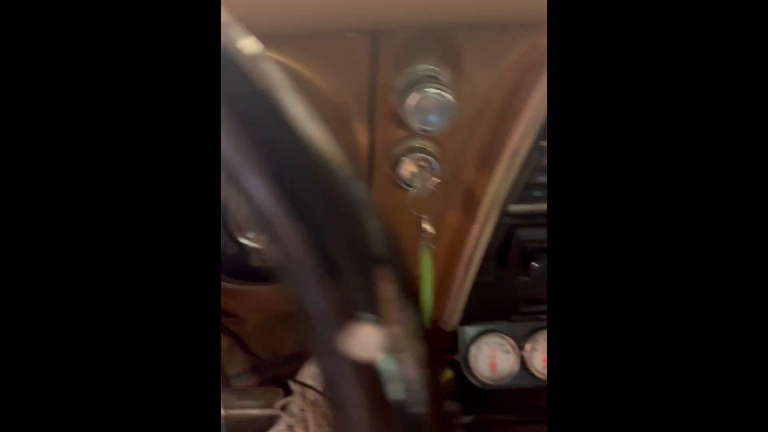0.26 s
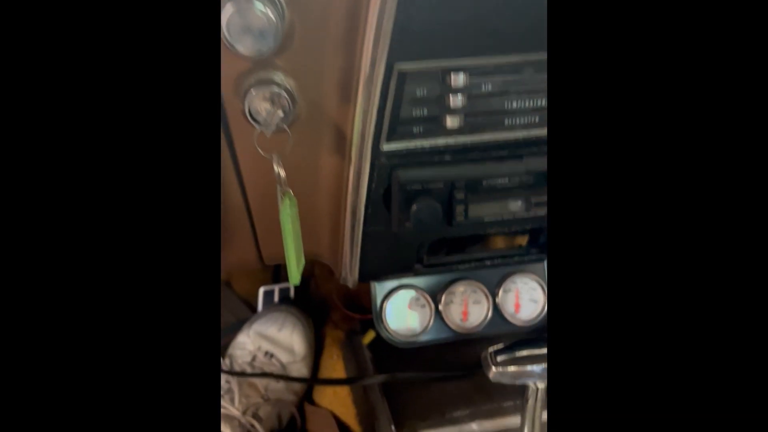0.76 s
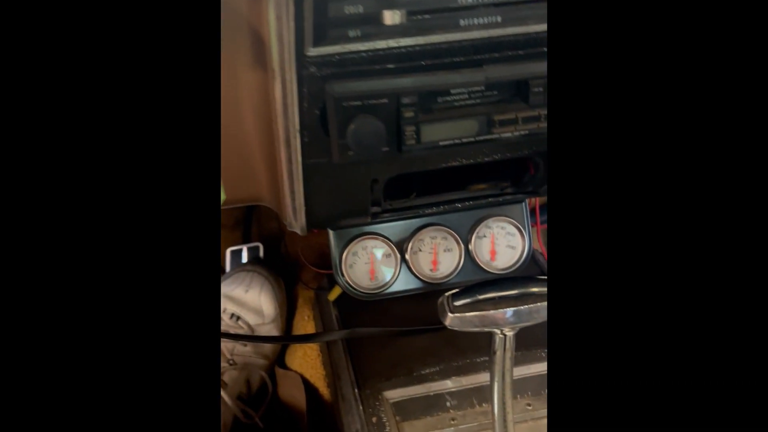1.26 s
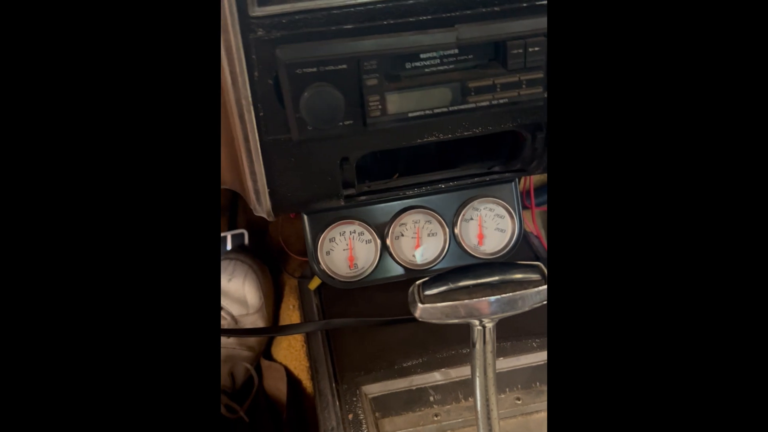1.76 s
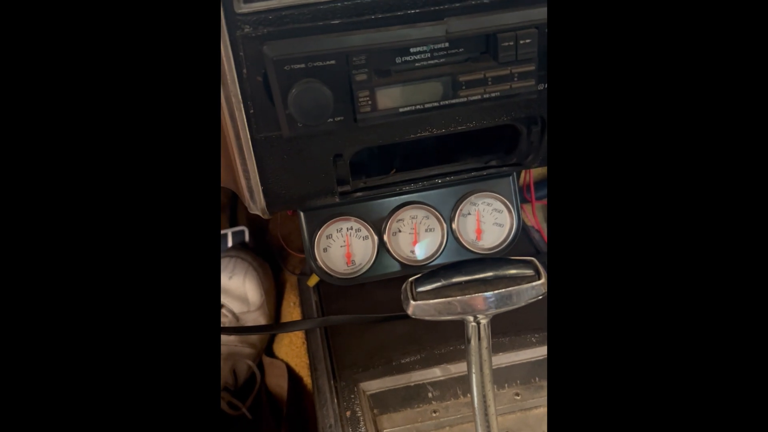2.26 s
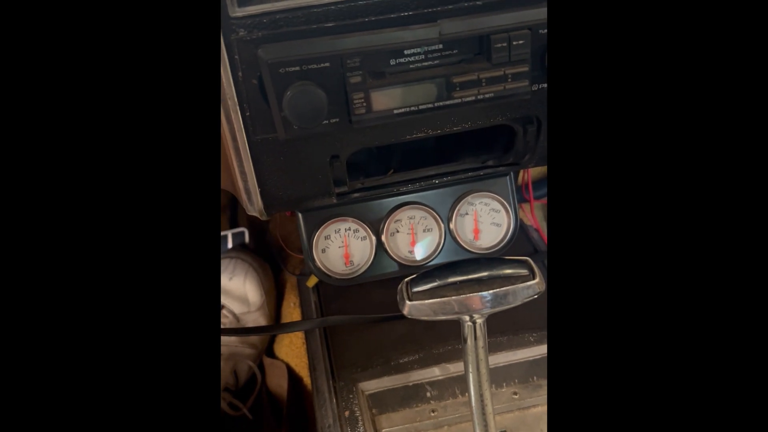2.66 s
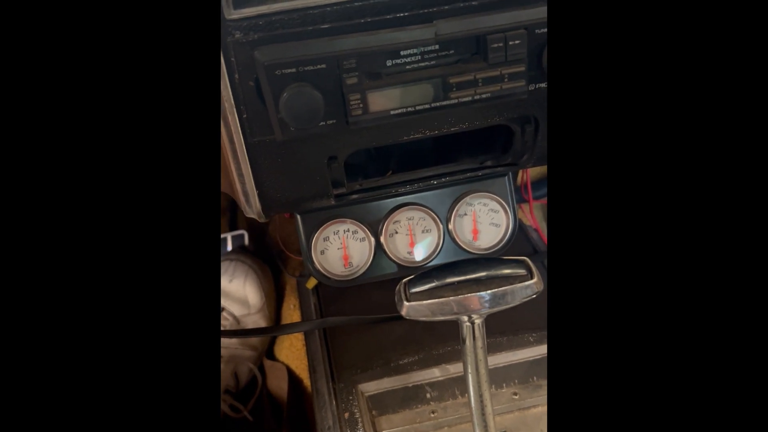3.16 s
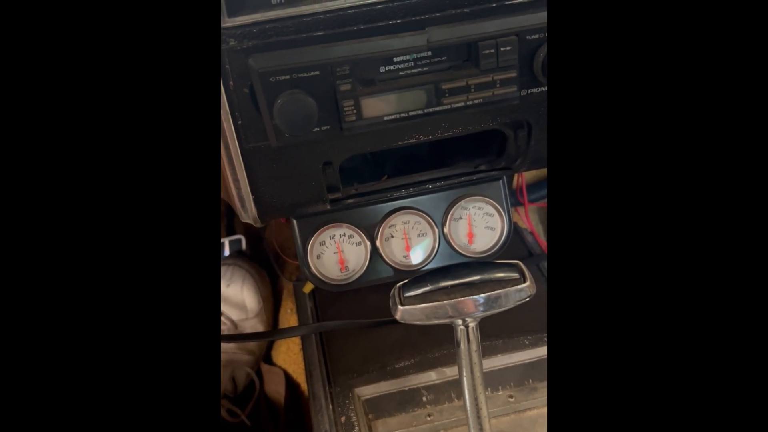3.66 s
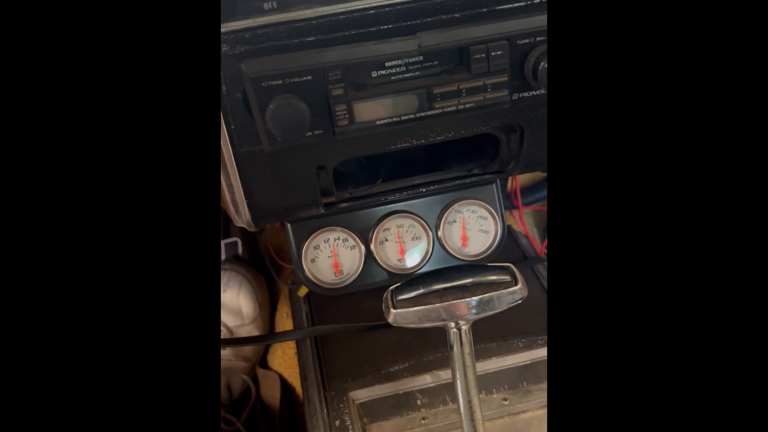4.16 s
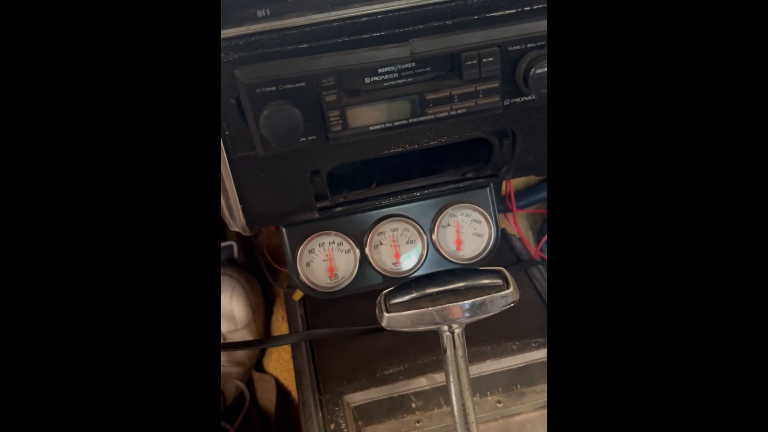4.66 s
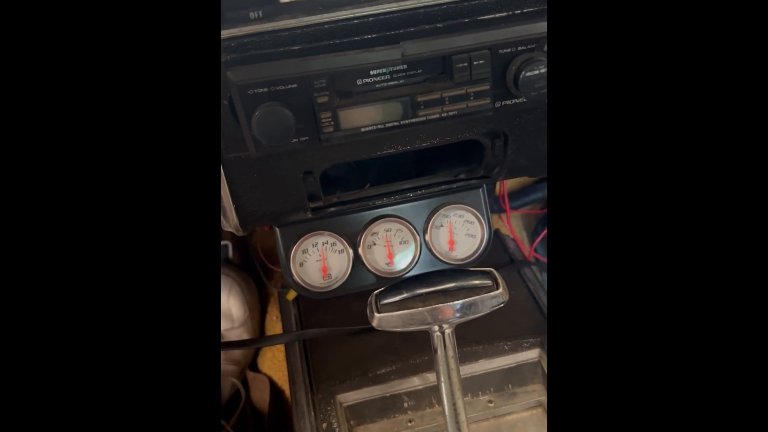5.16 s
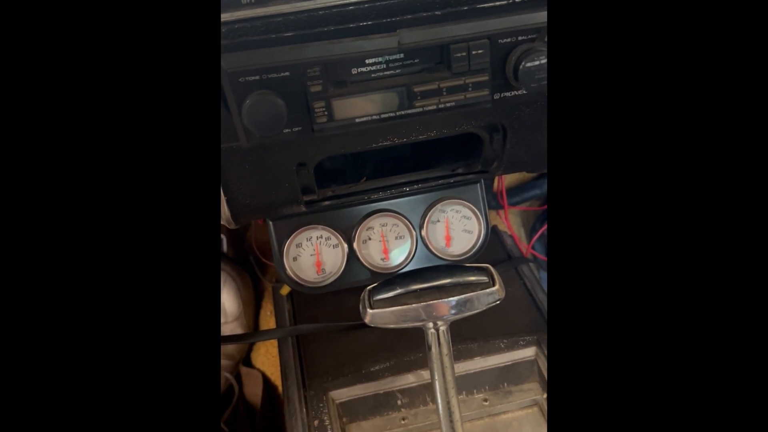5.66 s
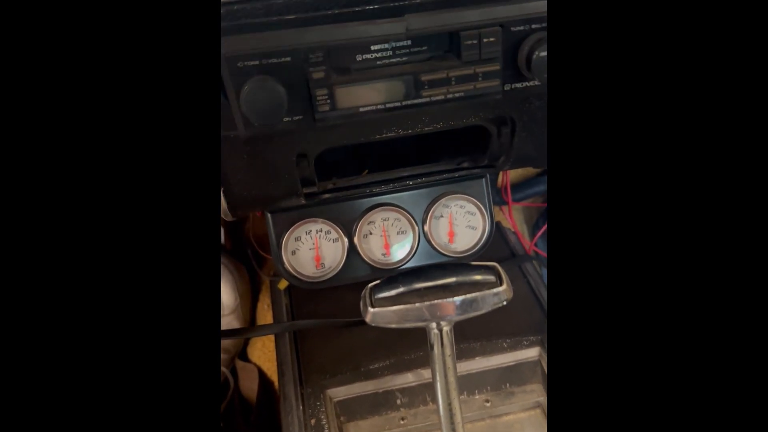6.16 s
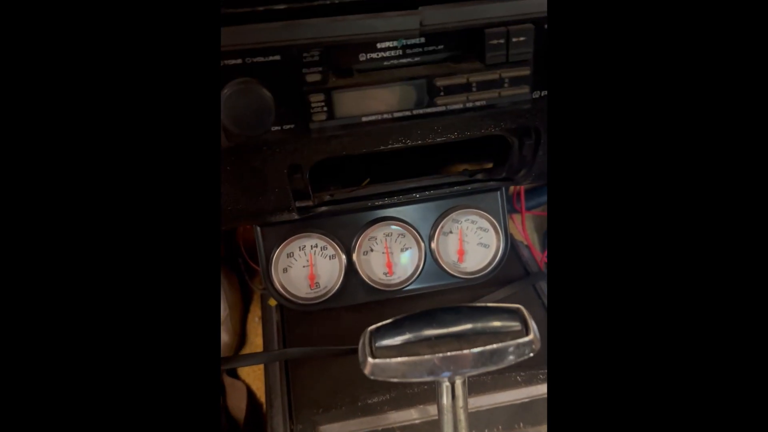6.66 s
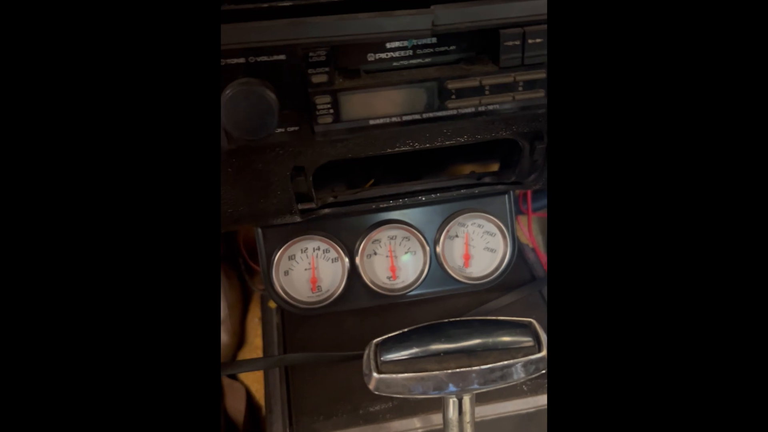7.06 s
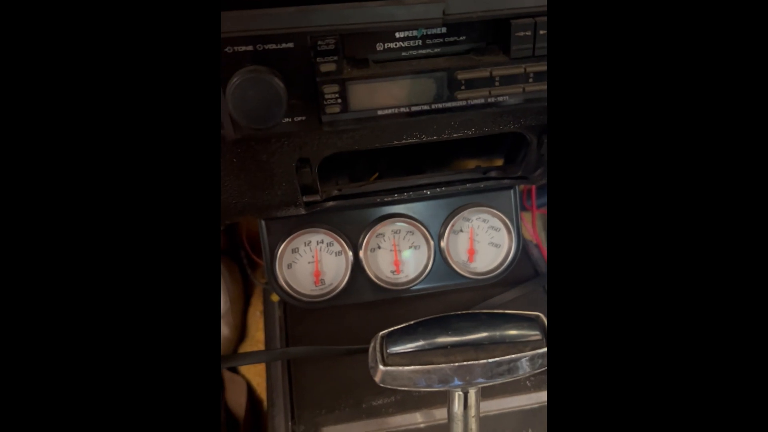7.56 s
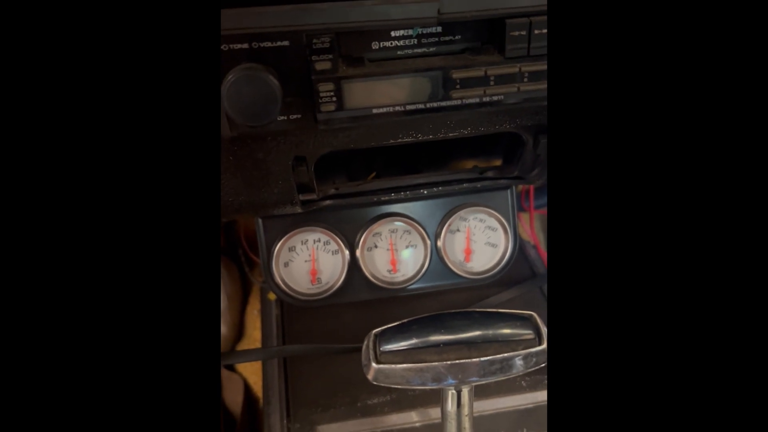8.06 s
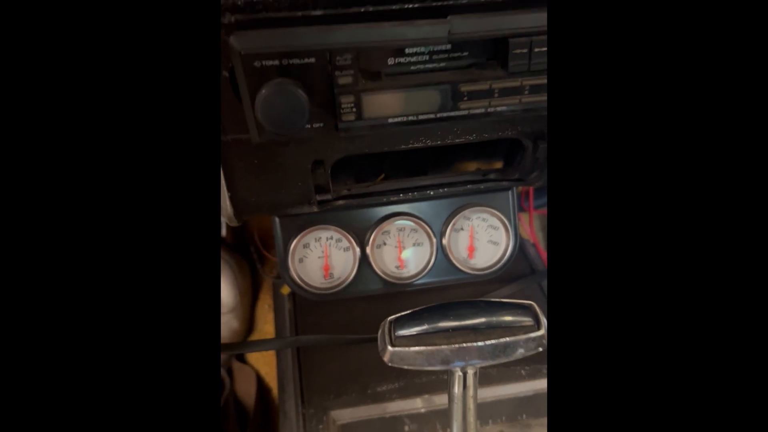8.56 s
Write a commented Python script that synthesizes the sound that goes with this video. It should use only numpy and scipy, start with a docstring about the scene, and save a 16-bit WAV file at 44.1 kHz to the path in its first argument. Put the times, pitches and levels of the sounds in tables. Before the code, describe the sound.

A steady low engine drone drops away at two seconds, almost dies, then catches and throbs unevenly, with breathy carburettor hiss and loose panel knocks.

```python
"""From the driver's seat, in a workshop, two microphone ports hear a V8 with a wild cam.
First a fast-idle drone of steady lines on the cycle rate, under a resonant rasp and a rush of air.
From about 2 s it slows, nearly stalls, catches and lopes: uneven clicks ring the boom of pipes and cabin.
Filtered-noise gulps of carburettor air hiss from 2.5 s; narrow-band whistles join some from 3.6 s.
From 4.4 s a loose panel knocks now and then, as short runs of clicks ring its modes."""
import sys
import numpy as np
from scipy import signal
from scipy.fft import rfft, irfft
from scipy.io import wavfile
from scipy.ndimage import uniform_filter1d, minimum_filter1d

SR = 44100
rng = np.random.default_rng(int(sys.argv[2]) if len(sys.argv) > 2 else 0)


def unload_audio(sound):
    """Save the sound as a 16-bit wav file, at the path given as the first command line argument."""
    columns = np.transpose(np.atleast_2d(sound))
    # keep every value between -1 and 1, then stretch to whole-number steps
    steps = np.round(np.clip(columns, -1, 1) * 32767)
    wavfile.write(sys.argv[1], SR, steps.astype(np.int16))


N = 388521
TIME = np.arange(N) / SR
FREQS = np.maximum(np.fft.rfftfreq(N, 1 / SR), 1)

# engine speed, eight firings to a cycle: t/s, firing rate f/Hz
ENGINE_SPEED = [(0, 100.3), (.6, 101.7), (1.2, 100.7), (1.88, 101.5), (2.02, 90), (2.25, 73), (2.5, 60),
                (2.9, 46), (3.6, 38.6), (4.0, 41.8), (4.4, 53), (5, 43.5), (5.85, 41.5), (6.6, 45),
                (6.9, 43)]


def from_db(db):
    """Decibels to gain."""
    return 10 ** (np.asarray(db) / 20)


def rms_one(x):
    """Scale to unit rms."""
    return x / np.sqrt(np.mean(x ** 2) + 1e-20)


def short_rms(x, span_s):
    """Running rms, smoothed twice over the span, with a small floor."""
    size = max(int(span_s * SR), 2)
    power = uniform_filter1d(uniform_filter1d(x * x, size), size)
    return np.sqrt(np.maximum(power, 0) + 1e-5 * np.mean(power))


def in_time(rows):
    """A curve at every sample; its ends are held."""
    return np.interp(TIME, *np.transpose(rows))


def over_hz(points):
    """A curve at every frequency, straight in log frequency."""
    hz, value = np.transpose(points)
    return np.interp(np.log(FREQS), np.log(hz), value)


def drift(rate_hz):
    """Slow chance of spread 1, falling away above the rate."""
    knots = np.arange(0, N + 200, 100)
    hz = np.fft.rfftfreq(len(knots), knots[1] / SR)
    spectrum = rfft(rng.standard_normal(len(knots))) / (1 + (hz / rate_hz) ** 4)
    slow = irfft(spectrum, len(knots))
    return np.interp(np.arange(N), knots, rms_one(slow))


def resonate(x, modes):
    """Parallel two-pole resonances of alternating sign."""
    out = 0
    for k, (hz, width_hz, db) in enumerate(modes):
        r = np.exp(-np.pi * width_hz / SR)
        poles = [1, -2 * r * np.cos(2 * np.pi * hz / SR), r * r]
        gain = (-1) ** k * from_db(db) * (1 - r * r) / 2
        out = out + gain * signal.lfilter([1, 0, -1], poles, x + 1e-18)
    return out


def band(x, low_hz, high_hz, order):
    """Butterworth band-pass."""
    return signal.sosfilt(signal.butter(order, [low_hz, high_hz], "band", fs=SR, output="sos"), x)


def air_noise(gain, ripple_db):
    """Stereo turbulence; close reflections in the cabin comb its spectrum, differently at each port."""
    # likeness of the two microphone ports: f/Hz, likeness (0-1)
    likeness = [(200, 0.95), (900, 0.93), (1400, 0.88), (1900, 1), (2400, 0.17), (3500, 0.11), (4900, 0.17),
                (5900, 0.11), (8800, 0.25), (15000, 0.68)]
    # phase by which the left port leads: f/Hz, phase/rad
    port_phase = [(200, -2.4), (2000, 0.47), (2700, 2), (4000, 0.25), (5100, -1.6), (5900, -0.92),
                  (12000, -1.05), (15500, -2)]
    alike = np.clip(over_hz(likeness), 0, 1)
    sign = np.array([[1], [-1]])  # left, right
    shared_share, own_share = np.sqrt(1 + alike), sign * np.sqrt(1 - alike)
    mid, side = rfft(rng.standard_normal((2, N)))
    ports = shared_share * mid + own_share * side
    ports = ports * np.exp(.5j * sign * over_hz(port_phase))
    # the spectrum of 12 ms of chance makes the ripple
    shared, own = rfft(rng.standard_normal((2, int(0.012 * SR))), N).real
    comb = rms_one(shared_share * shared + own_share * own)
    return rms_one(irfft(ports * gain * from_db(ripple_db * comb), N))


def firings(cycles, unevenness, scatter_db, jitter_s):
    """One click a firing: the banks reach the cabin unequally, and in the lope the same ones keep missing."""
    # strength of each burn over the two cycles in which the lope repeats: level/dB
    burn_level = [0, -20, 0, -13, 2, -24, -5, -1, -24, 0, -22, 0, -2, -23, 1.5, -25]
    # firings that take the longer pipe: 1 if so, else 0
    far_bank = [0, 1, 1, 0, 1, 0, 0, 1]
    far_bank_delay_s = .0041
    # relative level pattern of the eight cylinders; its depth in dB is set below
    cylinder_pattern = np.array([-2.5, 0.0, 0.5, 0.0, -14.0, -2.0, -2, -1.0])
    at = np.flatnonzero(np.diff(np.floor(cycles * len(cylinder_pattern))))
    uneven = unevenness[at]
    chance = rng.standard_normal((len(at), 2)) * uneven[:, None]

    burn_number = np.round(cycles[at] * len(cylinder_pattern)).astype(int)
    burn_db = np.take(burn_level, burn_number, mode="wrap")
    cylinder_db = (3.0 - uneven) * np.resize(cylinder_pattern, len(at))
    strength = from_db(cylinder_db + uneven * burn_db + scatter_db * np.minimum(chance[:, 0], 1.5))

    pipe_number = np.round(cycles[at] * len(far_bank)).astype(int)
    late_s = far_bank_delay_s * uneven * np.take(far_bank, pipe_number, mode="wrap")
    shift = ((late_s + jitter_s * chance[:, 1]) * SR).astype(int)
    clicks = np.zeros(N)
    clicks[np.clip(at + shift, 0, N - 1)] = strength
    return clicks


def drone(cycles):
    """Even firing gives clean lines on the cycle rate; the upper ones, partly in step, throb once a cycle."""
    # even running: t/s, relative level/dB
    drone_level = [(0, -13), (1.0, -13.5), (1.95, -12.5), (2.15, -17), (2.25, -20.5), (2.48, -22),
                   (2.6, -42), (2.8, -74)]
    # exhaust note on fast idle: multiple of the cycle rate, relative level/dB
    note_lines = [(3, -42), (4, -50), (5, -19.5), (6, -22.5), (7, -24.5), (8, 5.5), (9, -14.5), (10, -12),
                  (11, -20), (12, -13.5), (14, -23), (15, -30.5), (17, -34), (18, -23), (19, -25.5),
                  (20, -31), (22, -35), (24, -33), (26, -42), (27, -29.5), (28, -31), (29, -31.5),
                  (30, -30), (31, -33.5), (32, -39.5)]
    out = np.zeros(N)
    wavers = [drift(3.7) for k in range(5)]
    for k, (multiple, db) in enumerate(note_lines):
        waver_db = .7 if db < -10 else .25
        spread = 1 if multiple < 14 else .4  # range of starting phases, in turns of 2 pi
        phase = 2 * np.pi * (round(multiple) * cycles + spread * rng.random())
        out += from_db(db + waver_db * wavers[k % len(wavers)]) * np.sin(phase)
    return from_db(in_time(drone_level)) * out


def rasp(clicks, cycles, loping):
    """Each firing is a crack and a puff of gas in the higher resonances; on fast idle it throbs each cycle."""
    # rasp of the exhaust: t/s, relative level/dB
    rasp_level = [(0, -35.5), (1.85, -36), (2.2, -37.5), (2.5, -48), (3.0, -52), (3.55, -56), (3.95, -48),
                  (4.3, -35), (5.4, -42.5), (6.2, -38.5), (8.8, -39)]
    # higher pipe and panel resonances: f/Hz, width/Hz, relative level/dB
    rasp_modes = [(187.9, 8, 8), (243.4, 16, 1), (280.3, 22, -2.5), (342.6, 19.7, 3), (386, 17, -6),
                  (439.5, 29, -13.5), (608.4, 33, -12), (781.6, 40, -14), (1140, 270, -32.5)]
    puff_fall_s = 0.055
    gas = signal.lfilter([1], [1, -np.exp(-1 / (puff_fall_s * SR))], clicks + 1e-18)
    puff = gas * rng.standard_normal(N)
    throb = from_db(4.5 * (1 - loping) * np.cos(2 * np.pi * cycles))
    blows = throb * (clicks + (0.012 + .045 * loping) * puff)
    ringing = band(resonate(blows, rasp_modes), low_hz=144, high_hz=1200, order=2)
    return from_db(in_time(rasp_level)) * ringing / short_rms(ringing, span_s=0.24)


def air_rush(loping):
    """Air and fan rush as coloured noise; belt and fan whines are narrow resonances that fade in the lope."""
    # rush of air and fan: t/s, relative level/dB
    rush_level = [(0, -63), (1.88, -58.5), (1.98, -54), (2.15, -55), (2.26, -64), (2.8, -67), (2.9, -71.5),
                  (3.5, -72), (3.9, -62.5), (8.8, -54.5)]
    # its spectrum: f/Hz, relative level/dB
    rush_colour = [(200, 1.5), (700, 6.5), (1100, 6), (1500, 0.5), (2100, -2), (2600, -0.5), (3100, -4),
                   (5500, -4.5), (7600, -4.5), (8600, -5.5), (9600, -7.5), (13000, -10), (15700, -15.5)]
    # faint whines of belts and fan: f/Hz, width/Hz, level/dB against the rush
    whines = [(2620, 50, 7), (3546, 64, 8), (7600, 180, 5), (9540, 120, 6.5)]
    noise = air_noise(from_db(over_hz(rush_colour)), ripple_db=2.0)
    rush = from_db(in_time(rush_level) + 6.5) * noise
    # the whines ring from the same noise, shifted a second
    return rush + (1 - loping) * resonate(np.roll(rush, SR, axis=1), whines)


def boom(clicks):
    """Lumpy firings ring the pipes and the cabin air: each mode follows the throbs to its own degree."""
    # boom between throbs: t/s, relative level/dB
    boom_level = [(2.3, -24), (3.0, -31), (3.5, -35), (4.3, -19), (5.8, -24), (6.5, -18.5)]
    # throbs, each a run of hard burns: middle t/s, half length/s, relative level/dB
    throbs = [(2.31, 0.14, -15), (2.584, 0.038, -17.0), (2.742, 0.081, -18), (3.015, 0.11, -21.5),
              (3.37, 0.23, -27), (3.803, 0.11, -17.0), (4.12, 0.1, -14.5), (4.265, 0.033, -4),
              (4.394, 0.032, -8.5), (4.59, 0.14, -8.5), (4.743, 0.016, -8.5), (4.84, 0.048, -11),
              (4.971, 0.031, -5.5), (5.073, 0.02, -8.5), (5.203, 0.051, -10), (5.354, 0.021, -3),
              (5.465, 0.044, -11), (5.613, 0.05, -11), (5.74, 0.02, -5.5), (5.875, 0.019, -10),
              (5.999, 0.065, -9.5), (6.179, 0.061, -9.0), (6.312, 0.032, -6.5), (6.402, 0.02, -9.5),
              (6.484, 0.075, -9), (6.61, 0.09, -6.5), (6.768, 0.0097, -8), (6.877, 0.069, -7.5),
              (7.131, 0.025, -4.5), (7.252, 0.081, -9.5), (7.42, 0.02, -5), (7.507, 0.029, -7),
              (7.61, 0.038, -7), (7.798, 0.034, -6), (7.887, 0.017, -6.5), (8.006, 0.077, -9.5),
              (8.146, 0.04, -5), (8.312, 0.073, -9.5), (8.453, 0.013, -5), (8.541, 0.025, -2.5),
              (8.655, 0.051, -9.0), (8.77, 0.031, -6.5)]
    # pipes and cabin: f/Hz, width/Hz, relative level/dB, exponent with which it follows the throbs
    boom_modes = [(44, 4.3, -16, 0.42), (61.4, 5.8, -8, .8), (83.47, 11.9, -7, 0.61), (95.54, 13, 1, 1.05),
                  (117.6, 6.1, -13.5, 0.86), (156.8, 5.3, -29.5, 0.39)]
    power = from_db(in_time(boom_level)) ** 2
    for s, spread_s, db in throbs:
        span = slice(int((s - .5) * SR), int((s + .5) * SR))
        power[span] += from_db(db) ** 2 * np.exp(-((TIME[span] - s) / spread_s) ** 2)
    level = np.sqrt(power)
    average = short_rms(level, span_s=0.75)
    out = 0
    for hz, width_hz, db, follows in boom_modes:
        mode = [(hz, width_hz, 0)]
        ringing = resonate(resonate(clicks, mode), mode)
        steady = ringing / short_rms(ringing, span_s=.09)  # quicker lumps come through
        out = out + from_db(db) * average * (level / average) ** follows * steady
    return out


def burst(age, length_s, rise_s, fall_db_per_s):
    """A quick swell, a short hold, then the dying echo of the workshop."""
    return np.clip(age / rise_s, 0, 1) * from_db(-fall_db_per_s * np.maximum(age - length_s, 0))


def intake_power():
    """Power of the air drawn in, gulp by gulp."""
    # gulps at the carburettor: t/s, length/s, relative level/dB
    gulp_times = [(2.555, .012, -53.5), (2.908, 0.05, -56.5), (2.988, 0.045, -58), (3.209, 0.015, -55),
                  (3.313, 0.016, -54), (3.384, 0.022, -51.5), (3.545, 0.026, -51), (3.592, 0.019, -46),
                  (3.67, 0.014, -44), (3.755, 0.012, -40.5), (3.794, 0.0066, -35), (3.856, 0.08, -67),
                  (3.958, 0.027, -44), (3.996, 0.016, -38), (4.03, 0.048, -40), (4.124, 0.028, -35.5),
                  (4.174, 0.057, -39), (4.246, 0.07, -35.0), (4.33, 0.11, -37), (4.458, 0.071, -39.5),
                  (4.559, 0.048, -42.5), (4.611, 0.02, -39.5), (4.673, 0.019, -41), (4.708, 0.062, -45),
                  (4.802, 0.037, -44), (4.913, 0.028, -43), (4.942, 0.108, -47), (5.07, 0.013, -40.5),
                  (5.174, 0.042, -46), (5.24, 0.02, -44.5), (5.29, 0.058, -40.5), (5.4, 0.012, -41.5),
                  (5.447, 0.012, -40), (5.559, 0.045, -41), (5.593, 0.16, -47), (5.699, 0.056, -42.5),
                  (5.843, 0.029, -39), (5.927, 0.133, -44.5), (6.088, 0.02, -37.5), (6.136, 0.034, -41),
                  (6.222, 0.072, -40), (6.339, 0.045, -43), (6.438, 0.046, -41), (6.503, 0.1, -43.5),
                  (6.575, 0.053, -36), (6.656, 0.014, -36.5), (6.7, 0.039, -41), (6.765, 0.026, -40.5),
                  (6.823, 0.021, -40.5), (6.868, 0.015, -39.0), (6.978, 0.018, -40), (7.025, 0.02, -41),
                  (7.075, 0.049, -38), (7.143, 0.014, -37.5), (7.189, 0.014, -37), (7.238, 0.014, -41.0),
                  (7.307, 0.013, -39.5), (7.353, 0.014, -38.5), (7.4, 0.013, -37), (7.454, 0.031, -39),
                  (7.514, 0.041, -38.5), (7.607, 0.013, -37.5), (7.68, 0.013, -40), (7.726, 0.019, -37.5),
                  (7.774, 0.01, -37.5), (7.823, 0.022, -38), (7.886, 0.017, -38.5), (7.982, 0.063, -44),
                  (8.102, 0.069, -38.5), (8.199, 0.015, -39), (8.245, 0.035, -37.5), (8.361, 0.012, -41.5),
                  (8.407, 0.013, -37.5), (8.478, 0.066, -38), (8.62, 0.035, -39.5), (8.73, 0.02, -38),
                  (8.757, 0.038, -37)]
    power = np.zeros(N)
    for s, length_s, db in gulp_times:
        span = slice(int(s * SR), int((s + .5) * SR))
        swell = burst(TIME[span] - s, length_s, rise_s=0.0097, fall_db_per_s=267)
        power[span] += (from_db(db) * swell) ** 2
    return power


def shifting_hiss():
    """The jet of air shifts by slow chance among three combings of one spectrum."""
    # spectrum of the gulps: f/Hz, relative level/dB
    gulp_colour = [(200, -28), (400, -3), (700, -2.5), (1200, -2), (2000, -1), (3300, -0.5), (5000, -1),
                   (7500, -1), (9200, -1), (10500, -3), (13000, -4.5), (15700, -11)]
    shares = from_db(10.0 * np.array([drift(9.2) for k in range(3)]))
    shares = shares / np.sqrt(np.sum(shares ** 2, axis=0))
    colour = from_db(over_hz(gulp_colour))
    return sum(share * air_noise(colour, ripple_db=5.0) for share in shares)


def gulps(clicks, power):
    """Bursts of intake hiss that flutter with the firings; low bands swell later and each band flickers."""
    # body resonances that the gulps excite: f/Hz, width/Hz, relative level/dB
    air_modes = [(619, 16, -18), (772.5, 15, -6.5), (808, 8, -13.5), (938, 67, -12), (1130, 73, -15),
                 (1582, 40, -15.5), (1695, 210, -21), (2082, 35, -14.5), (2395, 130, -16)]
    hiss = rfft(shifting_hiss())
    centres = np.geomspace(700, 14000, 9)
    out = 0
    for hz, share in zip(centres, np.eye(len(centres))):
        linger = np.exp(-hz / (9 * SR))  # the panels ring on for some cycles
        swell = np.sqrt(signal.lfilter([1 - linger], [1, -linger], power + 1e-18))
        hiss_band = irfft(hiss * np.interp(FREQS, centres, share), N)
        out = out + swell * from_db(2.86 * drift(23.5)) * hiss_band

    # below this speed the gulps shake the body less
    shake_speed_hz, shake_db_per_hz = 43.5, 1.2
    slowness_hz = np.maximum(shake_speed_hz - in_time(ENGINE_SPEED), 0)
    shake = np.sqrt(power) * from_db(-shake_db_per_hz * slowness_hz)
    for hz, width_hz, db in air_modes:  # each resonance is driven with a wandering strength of its own
        blow = shake * from_db(db - 6.0 + 10.6 * np.tanh(drift(20.0))) * rng.standard_normal(N)
        # narrow modes pass less noise, so they are raised to match
        out = out + resonate(blow, [(hz, width_hz, 0)]) * np.sqrt(SR / (np.pi * width_hz))
    flutter = rms_one(band(clicks, low_hz=30, high_hz=160, order=1))
    return from_db(-0.68 + .5 * flutter) * out


def whistles():
    """Breathy edge tones at the throttle plate: narrow bands of turbulence that swell and die."""
    # gulps that whistle: t/s, f/Hz, level/dB
    whistle_times = [(3.598, 8660, -48.5), (3.798, 9060, -32.5), (3.966, 8700, -39.5), (4.005, 8940, -38.5),
                     (4.127, 8980, -36), (4.255, 9660, -38), (4.405, 9450, -40), (5.72, 9000, -41.5),
                     (5.85, 8500, -41.5), (7.52, 8940, -37)]
    out = np.zeros((2, N))
    breathy = air_noise(1, ripple_db=2.0)
    for s, hz, db in whistle_times:
        span = slice(int(s * SR), int((s + .5) * SR))
        tone = rms_one(band(breathy[:, span], hz * .98, hz / .98, order=2))
        swell = burst(TIME[span] - s, 0.0042, rise_s=0.0059, fall_db_per_s=180)
        out[:, span] += from_db(db) * tone * swell
    return out


def rattles(count=3):
    """A loose panel chatters in short runs of touches, each striking every mode differently."""
    # knocks of the panel: t/s, relative level/dB
    knocks = [(4.412, -42), (5.245, -40), (5.444, -41), (6.014, -30.5), (6.564, -36), (6.622, -40),
              (6.868, -37), (7.136, -34.5), (7.51, -32.5), (7.674, -36), (7.892, -36), (8.255, -33.5),
              (8.564, -39)]
    # its modes: f/Hz, width/Hz, relative level/dB
    panel_modes = [(780, 22, -20), (820, 26, -3.5), (944, 30, -12.5), (1990, 30, -20), (2184, 34, -17.5)]
    touch_gap_s = .008
    s, db = np.transpose(knocks)
    steps = np.arange(count) + .25 * rng.standard_normal((len(s), count))
    touches_s = s[:, None] + touch_gap_s * steps
    out = 0
    for hz, width_hz, mode_db in panel_modes:
        clicks = np.zeros(N)
        strike_db = db[:, None] + mode_db + 2.5 * rng.standard_normal(touches_s.shape)
        clicks[(touches_s * SR).astype(int)] = from_db(strike_db)
        # a click starts every mode equally high, whatever its width
        out = out + resonate(clicks, [(hz, width_hz, 0)]) * SR / (2 * np.pi * width_hz)
    return out


def scene():
    """Exhaust sounds fill the cabin; the intake comes through from the engine bay."""
    cycles = np.cumsum(in_time(ENGINE_SPEED)) / SR / 8
    loping = in_time([(1.95, .1), (2.5, 1)])  # t/s, share of uneven running
    clicks = firings(cycles, loping, scatter_db=1.6, jitter_s=.0006)
    low = drone(cycles) + loping * from_db(-3.0) * boom(clicks)
    # left and right levels differ slightly
    exhaust = low * from_db([[.12], [-.12]]) + rasp(clicks, cycles, loping) * from_db([[.6], [-.6]])
    # adding the slope shifts time by 33 microseconds: it reaches the right port a little earlier
    apart = np.gradient(exhaust, axis=1) * SR * 3.3e-5 * np.array([[-1], [1]])
    intake = gulps(clicks, intake_power()) + whistles()
    return exhaust + apart + air_rush(loping) + intake + rattles()


def record(dry):
    """A limiter eases the loudest peaks of both ports together; the top is cut steeply."""
    cutoff_hz = 15750
    headroom = np.minimum(1, .9 / (np.abs(dry).max(axis=0) + 1e-9))
    gain = uniform_filter1d(minimum_filter1d(headroom, size=900), size=900)
    top_cut = signal.ellip(10, .1, 80, cutoff_hz, fs=SR, output="sos")
    return signal.sosfilt(top_cut, dry * gain)


dry = scene()
out = record(dry)
unload_audio(out)
```